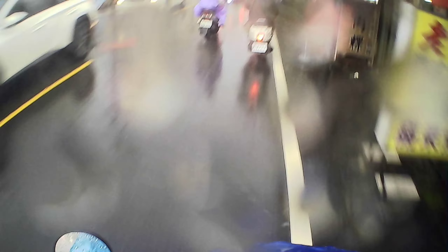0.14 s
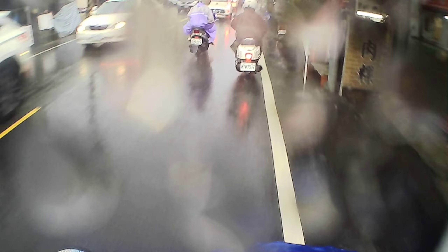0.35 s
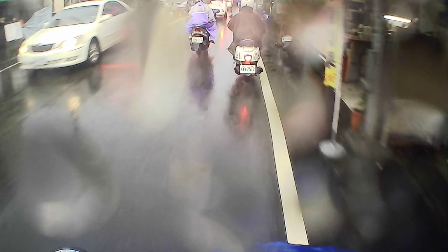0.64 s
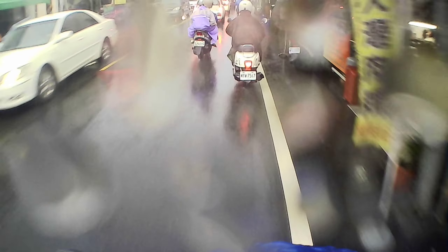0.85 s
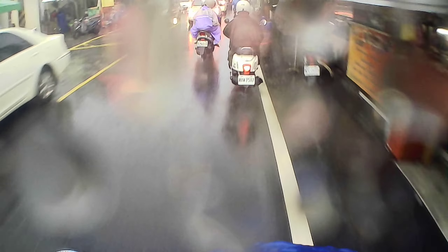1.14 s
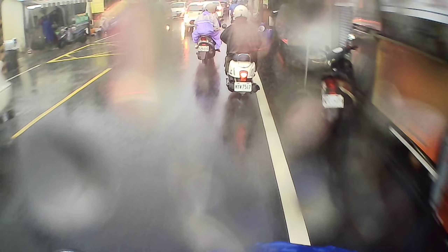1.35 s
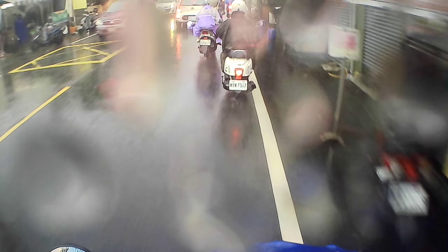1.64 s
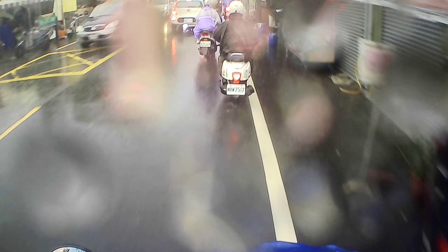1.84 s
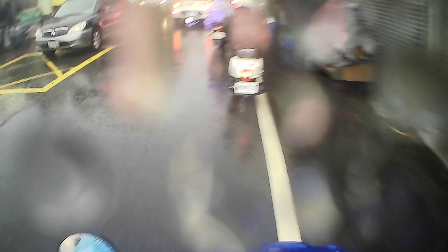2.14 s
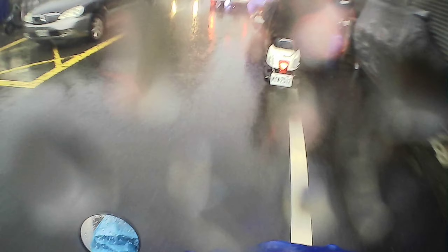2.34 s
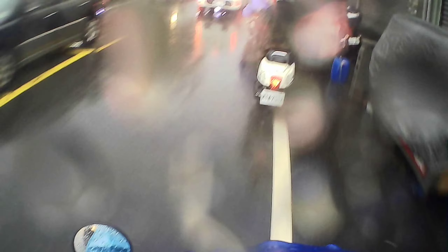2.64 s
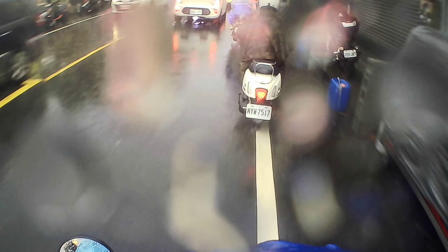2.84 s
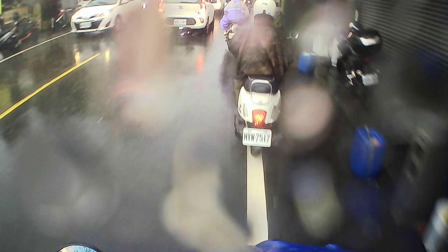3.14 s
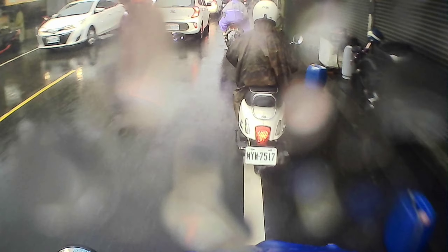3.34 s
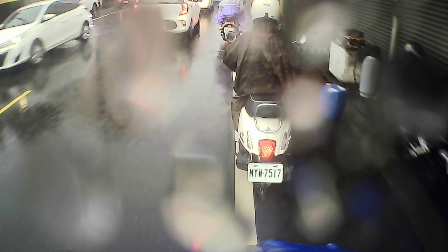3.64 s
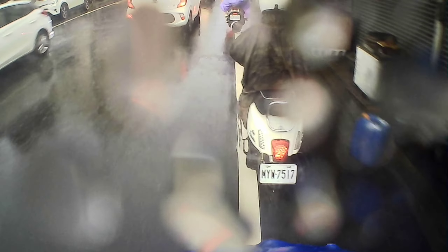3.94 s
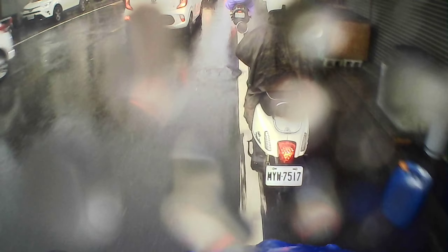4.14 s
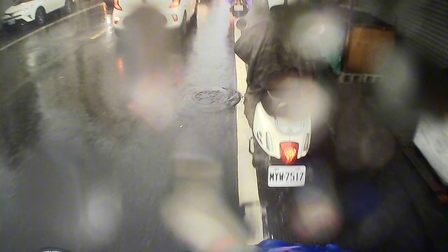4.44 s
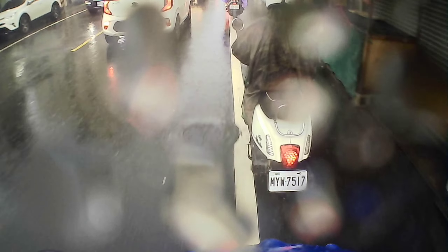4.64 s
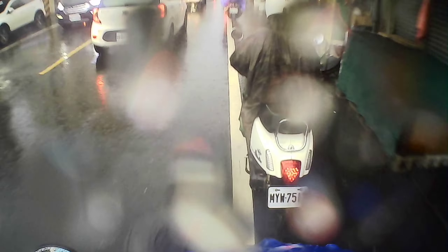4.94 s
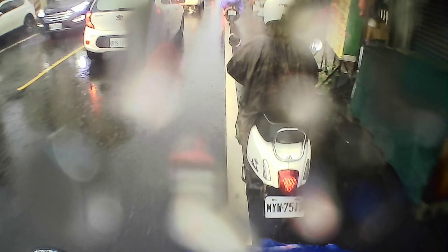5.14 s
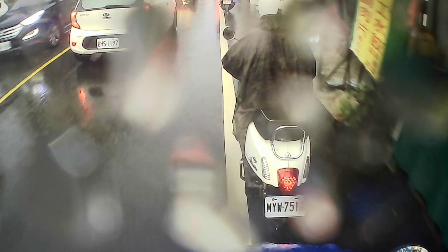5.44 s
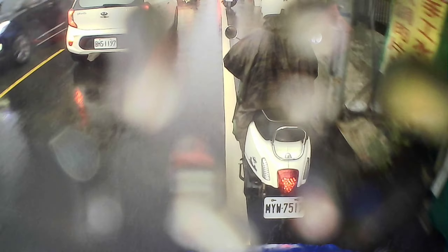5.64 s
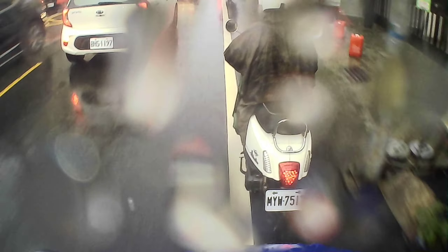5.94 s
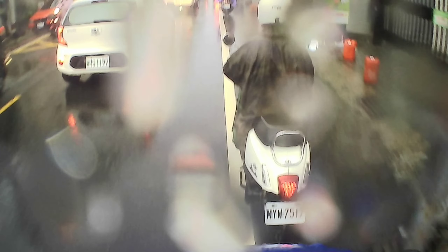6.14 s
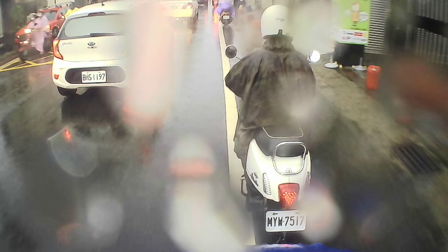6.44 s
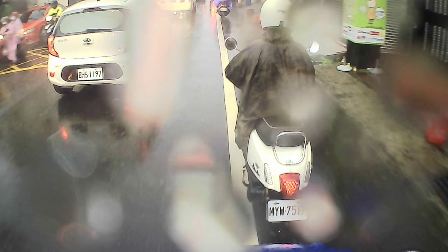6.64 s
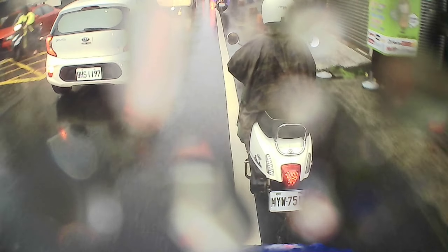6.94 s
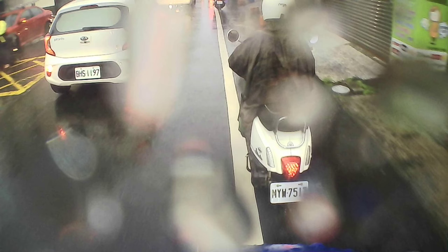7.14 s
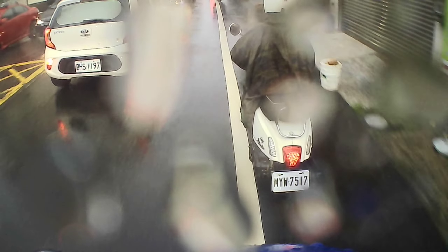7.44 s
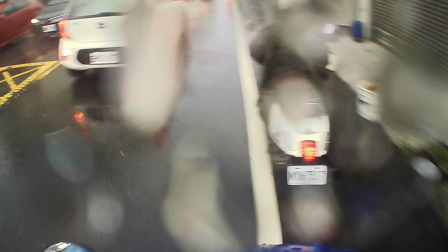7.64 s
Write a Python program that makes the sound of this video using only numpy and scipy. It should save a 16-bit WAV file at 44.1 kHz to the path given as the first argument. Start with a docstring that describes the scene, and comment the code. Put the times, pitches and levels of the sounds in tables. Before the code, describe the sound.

A low, wavering scooter hum and wet road hiss under crackling raindrops, with a short brake squeal and a few bumpy knocks.

```python
"""An engine hums low and tyres hiss on a wet street under pattering rain: a scooter heard from a cased camera.
Engine and brake are unsteady tones; the drive's brief whine is one more, swelling and fading as it sags.
Road sound is coloured noise. Drops are noise bursts through case resonances, or blows on decaying modes.
Bumps heave the bike in slow swings that rise and fall alike, and the mount knocks and clicks.
The treble is dulled, over a very faint steady noise floor that reaches higher."""
import sys
import numpy as np
from scipy import signal
from scipy.fft import rfft, irfft
from scipy.io import wavfile
from scipy.ndimage import uniform_filter1d

SR = 44100
rng = np.random.default_rng(int(sys.argv[2]) if len(sys.argv) > 2 else 0)


def wav_out(sig):
    """Save sig, one row per channel (or a flat mono array), as 16-bit PCM at SR to the path in sys.argv[1]."""
    wavfile.write(sys.argv[1], SR, np.round(np.clip(np.atleast_2d(sig).T, -1, 1) * 32767).astype(np.int16))


N = 343539
T = np.arange(N) / SR
HIT_T = np.arange(2048) / SR  # time within one hit [s]


def undb(db):
    """Decibels to gain."""
    return 10 ** (np.asarray(db) / 20)


def unit(x):
    """Scale to rms 1."""
    return x / np.sqrt(np.mean(x ** 2))


def curves(table):
    """Join the points of each table column by straight lines over the whole scene."""
    times, *columns = np.transpose(table)
    return [np.interp(T, times, column) for column in columns]


def walk(rate):
    """Random drift with rms 1: held random values, about `rate` a second, smoothed twice."""
    hold = int(SR / rate)
    held = np.repeat(rng.standard_normal(N // hold + 1), hold)
    smooth = uniform_filter1d(uniform_filter1d(held, hold), hold)
    return unit(smooth[:N])


def colour(x, points):
    """Shape a sound by (frequency [Hz], level [dB]) points, falling 36 dB per octave beyond the ends; rms 1."""
    hz, db = np.transpose(points)
    octave = np.log2(np.maximum(np.arange(N // 2 + 1) * SR / N, 1))
    outside = np.abs(octave - np.clip(octave, np.log2(hz[0]), np.log2(hz[-1])))
    gain_db = np.interp(octave, np.log2(hz), db) - 36 * outside
    return unit(irfft(rfft(x) * undb(gain_db), N))


def add(out, s, sound):
    """Mix a sound in at time s [s]."""
    start = int(np.clip(s * SR, 0, N - 1))
    out[start:start + len(sound)] += sound[:N - start]


def sing(hz, waver, flutter_db, rate):
    """A rubbing or meshing part sounds one tone that drifts in pitch and level."""
    phase = 2 * np.pi * np.cumsum(hz * (1 + waver * walk(rate))) / SR
    return np.sqrt(2) * undb(flutter_db * walk(rate)) * np.sin(phase)


# engine speed as the fourth multiple of its firing rate, before waver: (time [s], frequency [Hz])
ENGINE_SPEED = [(0, 126.3), (.65, 120.9), (1.5, 104.6), (2.55, 85.2), (3.05, 103.5), (4.05, 96.24),
                (4.85, 86.8), (5.4, 122.7), (5.85, 141.8), (6.8, 149.7), (7.25, 138.3), (7.5, 130.3),
                (7.79, 126.5)]
# balance of the engine's tones: (multiple of the firing rate, relative level [dB])
ORDERS = [(2, 0), (3, 0), (4, 4.5), (5, -5.5), (6, -13.5), (7, -24.5), (8, -22), (10, -18), (12, -21.5)]
# overall level at the reference speed, before the balance of the tones
ENGINE_DB, ENGINE_HZ, REV_DB_PER_OCTAVE = -57.5, 120, 5


def engine(waver=0.0245, lumpy_db=3):
    """Uneven firings give a low stack of tones that sinks off throttle and climbs again, louder at higher revs."""
    hz, = curves(ENGINE_SPEED)
    firing_hz = hz / 4 * (1 + waver * walk(30))
    firing = 2 * np.pi * np.cumsum(firing_hz) / SR
    tones = np.zeros(N)
    for multiple, db in ORDERS:
        start_phase = 2 * np.pi * rng.random()
        tones += undb(db + lumpy_db * walk(16)) * np.sin(round(multiple) * firing + start_phase)
    rev_db = ENGINE_DB + REV_DB_PER_OCTAVE * np.log2(hz / ENGINE_HZ)
    return np.sqrt(2) * undb(rev_db) * tones


# tyres on the wet road, before the roar and hiss gains: (time [s], level [dB])
ROAD_LEVEL = [(0, -47.5), (.3, -47.5), (1.1, -47), (2.0, -47.5), (2.75, -48.5), (3.22, -47), (3.5, -49.5),
              (4.3, -49.5), (4.8, -48.5), (5.2, -51.5), (5.55, -47), (5.9, -47.5), (6.65, -45), (7.2, -45),
              (7.45, -47.5), (7.79, -45.5)]
# spectrum of the low roar: (frequency [Hz], relative level [dB per Hz])
ROAR_SPECTRUM = [(32, -4.5), (45, -6.5), (62, 4.5), (90, -1.5), (150, -0.5), (205, -6.5), (310, -6.5),
                 (430, -7.5), (620, -15.5), (750, -12.5), (880, -22), (1000, -19)]
# spectrum of the spray as heard through the case: (frequency [Hz], relative level [dB per Hz])
HISS_SPECTRUM = [(900, -15.5), (1100, -7), (1275, 2), (1390, -7.5), (1515, -1.5), (1700, -9), (1880, -10),
                 (2080, -19), (3200, -22.5), (3800, -24), (4200, -19), (4750, -33), (7100, -30),
                 (8400, -43.5)]


def road(roar_gain_db=-0.5, hiss_gain_db=0.74, grain_db=2, roar_swell=0.95):
    """Tyres and traffic roar low, while grainy spray hisses in the colour of the case and swells slightly more."""
    db, = curves(ROAD_LEVEL)
    roar_db = db.mean() + roar_swell * (db - db.mean())
    roar = colour(rng.standard_normal(N), ROAR_SPECTRUM)
    roar *= undb(roar_db + roar_gain_db + 1.2 * walk(23))
    spray = rng.standard_normal(N) * undb(grain_db * walk(300))
    hiss = colour(spray, HISS_SPECTRUM) * undb(db + hiss_gain_db + 0.46 * walk(20))
    return roar + hiss


def strike(modes, tilt_db=0, scatter_db=0, detune=0):
    """A blow with peak 1 sets decaying modes ringing; neighbours start in opposite directions."""
    out = np.zeros(len(HIT_T))
    for k, (hz, db, t60) in enumerate(modes):
        octaves_up = np.log2(hz / modes[0][0])
        gain = undb(db + tilt_db * octaves_up + scatter_db * rng.standard_normal())
        mode_hz = hz * (1 + detune * rng.standard_normal())
        decay = np.exp(-np.log(1000) * HIT_T / t60)
        out += (-1) ** k * gain * np.sin(2 * np.pi * mode_hz * HIT_T) * decay
    return out / np.abs(out).max()


def resonate(x, peaks):
    """Parallel resonances of the case colour a sound; neighbours have opposite polarity."""
    out = 0
    for k, (hz, width, db) in enumerate(peaks):
        b, a = signal.iirpeak(hz, hz / width, fs=SR)
        out = out + (-1) ** k * undb(db) * signal.lfilter(b, a, x)
    return out


# resonances of the case around the microphone, low to high:
# (frequency [Hz], width [Hz], relative level [dB])
CASE_THUD = [(273, 143, -1.5), (400, 300, -4)]
CASE_TOCK = [(570, 630, -2), (820, 430, 4)]
CASE_RING = [(1272, 210, -0.5), (1610, 180, -2), (1824, 180, -7.5)]
CASE_CRACK = [(2210, 500, -1.6), (3306, 700, 0.42)]
CASE_SNAP = [(4110, 317, 4), (4270, 960, -4)]
CASE_SPRAY = [(5190, 1220, 3.5), (7350, 1000, -3.5), (8000, 320, -9)]
SPLASH_TAIL_DB, SPLASH_TAIL_S = -20, .0037


def splash(peaks, burst_s=0.0021, first_db=16):
    """A snap, then a noise burst of a millisecond or two rattles a group of resonances; energy 1."""
    envelope = np.exp(-(HIT_T / burst_s) ** 2)
    envelope += undb(SPLASH_TAIL_DB) * np.exp(-HIT_T / SPLASH_TAIL_S)
    burst = envelope * rng.standard_normal(len(HIT_T))
    burst[0] += undb(first_db)
    edges = [.8 * peaks[0][0], 1.15 * peaks[-1][0]]
    b, a = signal.butter(1, edges, "band", fs=SR)
    ring = resonate(signal.lfilter(b, a, burst), peaks)
    return ring / np.linalg.norm(ring)


# bumps in the road: (time [s], heave level [dB], knock level [dB], knock brightness [dB per octave])
ROAD_BUMPS = [(2.618, -18, -49, -6), (3.554, -15, -30.5, -12), (3.847, -13.5, -27, -2),
              (4.451, -11.5, -18, 4), (4.878, -19.5, -36, -1), (4.952, -14.5, -28.5, -7),
              (5.164, -16, -30.5, 1), (5.693, -5, -35.5, -2), (5.758, -5.5, -26.5, 4.5)]
# modes of the mount, before random detuning: (frequency [Hz], relative level [dB], t60 [s])
MOUNT_MODES = [(229, 1.5, 0.024), (302, -1.5, 0.047), (451, 1, 0.029), (550, -6.5, 0.017),
               (800, -12, 0.019), (1080, -15, 0.0063)]


def suspension(bounce_hz=9, settle_s=0.049, sway_db=-31.5, click_db=-4, uneven_db=1.5):
    """The bike always sways; a bump heaves it, and the mount knocks and clicks near the top of the heave."""
    sway = colour(rng.standard_normal(N), [(6, -5.5), (12, 0), (18, -15), (28, -23), (45, -28)])
    out = undb(sway_db + uneven_db * walk(3.156)) * sway
    for s, heave_db, knock_db, tilt_db in ROAD_BUMPS:
        lag = T - s - .004  # the heave peaks 4 ms after the knock starts
        swell = np.exp(-np.hypot(lag, .002) / settle_s)  # rises and falls alike, with a rounded top
        out += undb(heave_db) * np.cos(2 * np.pi * bounce_hz * lag) * swell
        knock = strike(MOUNT_MODES, tilt_db=tilt_db, detune=0.06)
        click = undb(click_db) * splash(CASE_CRACK + CASE_SNAP + CASE_SPRAY)
        add(out, s, undb(knock_db) * (knock + click))
    return out


# modes of the case's shell, before random weighting and detuning:
# (frequency [Hz], relative level [dB], t60 [s])
SHELL_MODES = [(1281, -7.5, 0.017), (1509, -2, 0.022), (1844, -10.5, 0.017), (2270, -18.5, 0.017),
               (3145, -17.5, 0.0097), (3580, -25.5, 0.0076)]


def patter(rate=40, level_db=-39, spread_db=6, most_db=10.0, bright_db=3.5, bright_range_db=6):
    """Small drops strike the shell at random, `rate` a second, each with its own size and brightness."""
    out = np.zeros(N)
    for when, size, tilt in rng.random((int(rate * N / SR), 3)):
        size_db = min(-spread_db * np.log(1 - size), most_db)  # mostly small, a few large
        tilt_db = bright_db - bright_range_db * (tilt - .5)
        tick = strike(SHELL_MODES, tilt_db=tilt_db, scatter_db=2.0, detune=0.019)
        add(out, when * N / SR, undb(level_db + size_db) * tick)
    return out


def droplets(rate=7, level_db=-38, spread_db=6, most_db=9, thud_db=-4):
    """Fine droplets splash faintly right beside the microphone at random, `rate` a second."""
    out = np.zeros(N)
    for when, size in rng.random((int(rate * N / SR), 2)):
        size_db = min(-spread_db * np.log(1 - size), most_db)
        tick = splash(CASE_CRACK + CASE_SNAP + CASE_SPRAY)
        thud = undb(thud_db) * splash(CASE_THUD + CASE_TOCK)
        add(out, when * N / SR, undb(level_db + size_db) * (tick + thud))
    return out


def drop(groups, tilt_db, pivot_hz=1500):
    """Splashes rattle every (resonances, level [dB]) group; a harder landing tips the balance to the treble."""
    out = np.zeros(len(HIT_T))
    for peaks, db in groups:
        octaves_up = np.log2(peaks[0][0] / pivot_hz)
        out += undb(db + tilt_db * octaves_up) * splash(peaks)
    return out


# drops that smack the case near the microphone:
# (time [s], relative level [dB], brightness [dB per octave], ring of the shell [dB])
SMACK_DROPS = [(0.0202, -15.5, -1.5, 11), (0.201, -16.5, -2, 6), (0.5521, -14.5, 3.5, 9.5),
               (0.9616, -19.5, -0.5, -7), (1.072, -21, 1, 9), (1.16, -19.5, 0, 1), (1.4587, -13, 0.5, -0.5),
               (1.572, -10.5, -1, -3), (1.5921, -16, -1, 4), (1.652, -13, -0.5, 5), (1.681, -21, -1.5, 7),
               (1.7419, -21.5, 0.5, 18.5), (1.7722, -14, 0, 6), (1.9313, -16.5, -2, 4),
               (2.0294, -18, 1, -1), (2.1346, -21.5, -3.5, 11), (2.3067, -4, -.5, 8),
               (2.3756, -24, -5.5, 0), (2.6883, -23, 0.5, 5), (2.7761, -13.5, -1.5, 0.5),
               (3.5088, -3.5, 1, 3), (3.724, -20, 0.5, -5), (4.2677, -24, -1, 0), (4.3178, -17.5, -2, -6),
               (4.8025, -23, -1, -1), (4.9722, -11, -.5, 8.5), (5.0737, -24, -1.5, 1), (5.384, -15, -1, -9),
               (5.7684, -16, 0.5, 7.5), (6.017, -22, -1, 7), (6.2276, -27, 5.5, 15), (6.586, -23, 0.5, 4),
               (6.5949, -16.5, 0, 3), (6.7307, -16.5, -1.5, 2), (7.4051, -10.5, 0, 9),
               (7.4266, -18.5, -1.5, -7), (7.5631, -5.5, 0, 7.5)]


def smacks(thud_db=-4, tock_db=-4, crack_db=1, snap_db=-3, spray_db=-9):
    """Drops beside the microphone crack across all resonances; the spot they hit sets the shell's ring."""
    out = np.zeros(N)
    case = [(CASE_THUD, thud_db), (CASE_TOCK, tock_db), (CASE_CRACK, crack_db),
            (CASE_SNAP, snap_db), (CASE_SPRAY, spray_db)]
    for s, db, tilt_db, ring_db in SMACK_DROPS:
        add(out, s, undb(db) * drop(case + [(CASE_RING, ring_db)], tilt_db))
    return out


# larger drops that ring the shell, before the gain: (time [s], peak level [dB])
PLINK_DROPS = [(0.0538, -25), (0.082, -28), (0.1048, -27.5), (0.1118, -19.5), (0.282, -31), (0.471, -24.5),
               (0.6821, -27), (0.6954, -25.5), (0.7892, -26), (0.909, -25), (0.9731, -26.5), (1.4256, -23),
               (2.092, -28.5), (2.135, -26), (2.1651, -26.5), (2.375, -20.5), (2.419, -24), (2.723, -28.5),
               (2.8868, -30), (2.9632, -27), (3.0785, -30.5), (3.1919, -23), (3.242, -29), (3.2975, -31.5),
               (3.4059, -26.5), (3.4686, -29), (3.4785, -18.5), (4.13, -24), (4.2963, -26.5), (4.358, -27),
               (4.567, -29.5), (4.915, -32), (5.0456, -33), (5.433, -31.5), (5.455, -23.5), (5.8335, -20.5),
               (5.9409, -25), (5.9604, -20.5), (5.9836, -17.5), (6.2667, -27), (6.6194, -27.5),
               (6.8286, -23), (7.416, -22.5), (7.544, -16.5), (7.673, -26), (7.699, -24), (7.731, -22.5)]


def plinks(gain_db=3):
    """Each larger drop lands on another spot of the shell, so its modes are weighted and tuned at random."""
    out = np.zeros(N)
    for s, db in PLINK_DROPS:
        add(out, s, undb(db + gain_db) * strike(SHELL_MODES, scatter_db=2.0, detune=0.027))
    return out


# song of the wet brake, before waver and flutter: (time [s], frequency [Hz], level [dB])
BRAKE_SONG = [(1.2, 1335, -54), (1.55, 1332, -48.5), (1.68, 1294, -46.5), (1.78, 1286, -38),
              (1.83, 1262, -41), (1.88, 1260, -33), (1.95, 1284, -47.5), (2.28, 1285, -52),
              (2.6, 1274, -61)]


def brake():
    """The wet brake rubs out one unsteady tone while it is held, swelling and fading."""
    hz, db = curves(BRAKE_SONG)
    held = (T > BRAKE_SONG[0][0]) & (T < BRAKE_SONG[-1][0])
    return held * undb(db) * sing(hz, waver=.013, flutter_db=3, rate=90)


# heavy drops on the flat face of the case:
# (time [s], relative level [dB], brightness [dB per octave], splash [dB])
TOCK_DROPS = [(1.611, -22.5, 3, -4), (1.9749, -22.5, 17, 4.5), (2.5565, -22.5, -4, -2)]
# modes of that face: (frequency [Hz], relative level [dB], t60 [s])
FACE_MODES = [(548, 0, 0.019), (778, 3.5, 0.024)]


def tocks(thud_db=-2, ring_db=12, crack_db=2, snap_db=-3, spray_db=-10):
    """Heavy drops set the flat face ringing with a hollow tock under a splash."""
    out = np.zeros(N)
    case = [(CASE_THUD, thud_db), (CASE_RING, ring_db), (CASE_CRACK, crack_db),
            (CASE_SNAP, snap_db), (CASE_SPRAY, spray_db)]
    for s, db, tilt_db, splash_db in TOCK_DROPS:
        tock = strike(FACE_MODES, tilt_db=tilt_db)
        add(out, s, undb(db) * (tock + undb(splash_db) * drop(case, 0)))
    return out


WHINE_PEAK_S, WHINE_HZ, WHINE_DB = 6.88, 412, -51  # pitch and level at the peak, before flutter
WHINE_SAG_HZ_PER_S, WHINE_SWELL_S, WHINE_FADE_S = 70, 0.46, 0.36


def whine():
    """The drive's meshing tone swells and fades while its wavering pitch sags."""
    lag = T - WHINE_PEAK_S
    swell = np.exp(-(lag / np.where(lag < 0, WHINE_SWELL_S, WHINE_FADE_S)) ** 2)
    hz = WHINE_HZ - WHINE_SAG_HZ_PER_S * lag
    return undb(WHINE_DB) * swell * sing(hz, waver=.045, flutter_db=3.0, rate=76)


def scene():
    """Rain on the case over the running scooter."""
    scooter = engine() + road() + suspension() + brake() + whine()
    rain = patter() + droplets() + smacks() + plinks() + tocks()
    return (scooter + rain)[None]


CASE_TOP_HZ, TOP_HZ = 8450, 15700  # treble limits of the scene and of the noise floor


def record(dry, floor_db=-80.5):
    """The treble is dulled, over a very faint steady noise floor that reaches higher."""
    dull = signal.sosfilt(signal.ellip(8, .2, 70, CASE_TOP_HZ, fs=SR, output="sos"), dry)
    noisy = dull + undb(floor_db) * rng.standard_normal(dry.shape)
    return signal.sosfilt(signal.ellip(10, .2, 70, TOP_HZ, fs=SR, output="sos"), noisy)


dry = scene()
out = record(dry)
wav_out(out)
```